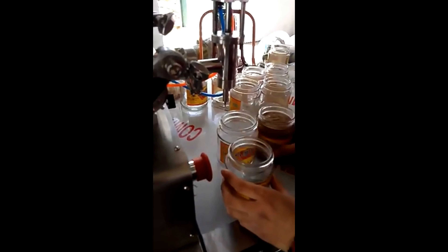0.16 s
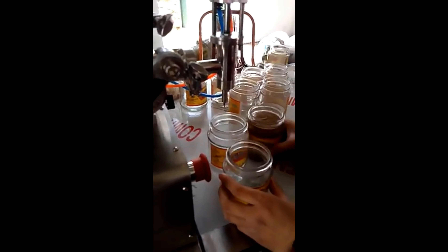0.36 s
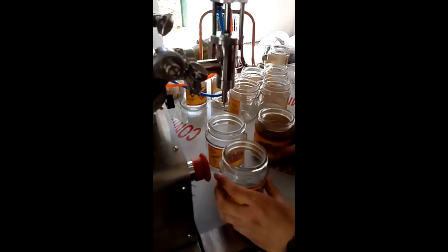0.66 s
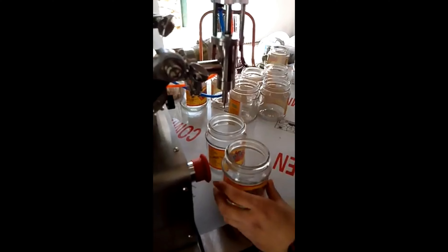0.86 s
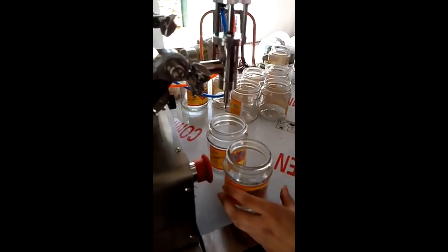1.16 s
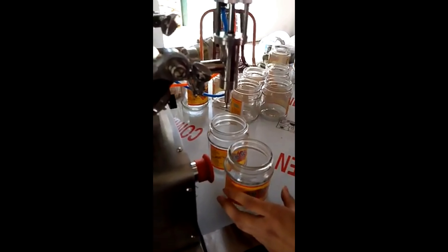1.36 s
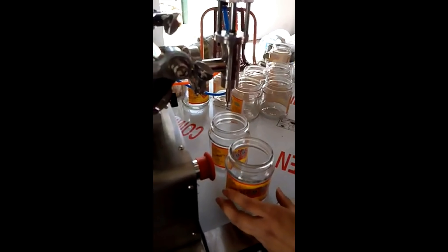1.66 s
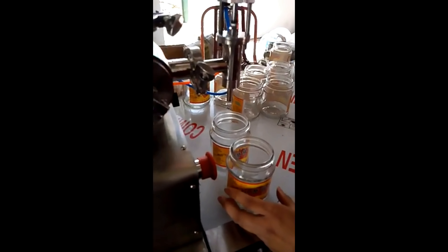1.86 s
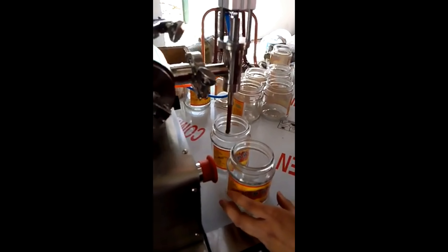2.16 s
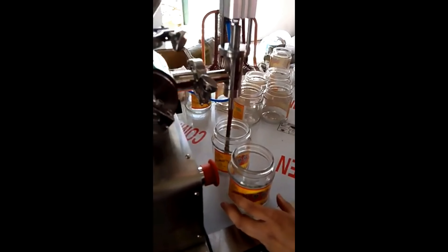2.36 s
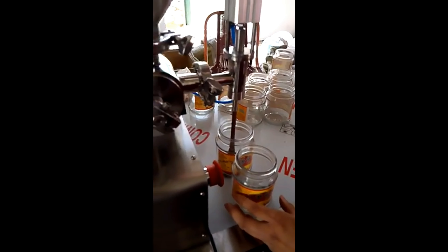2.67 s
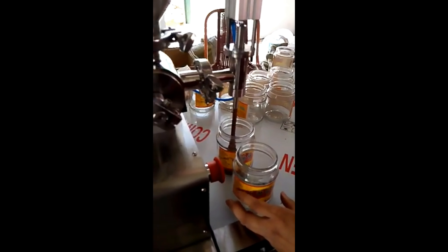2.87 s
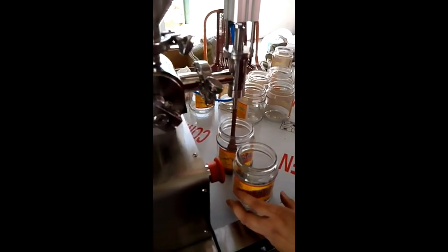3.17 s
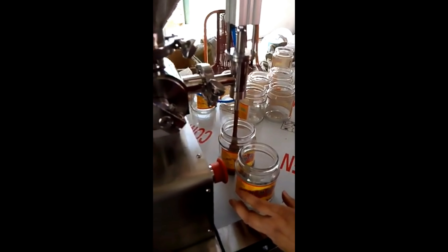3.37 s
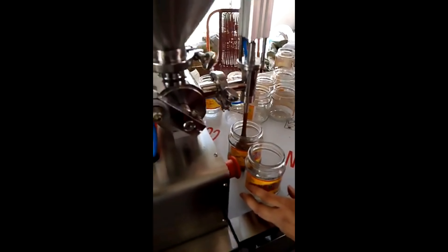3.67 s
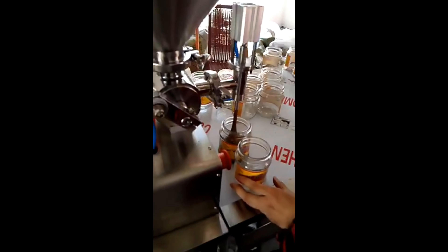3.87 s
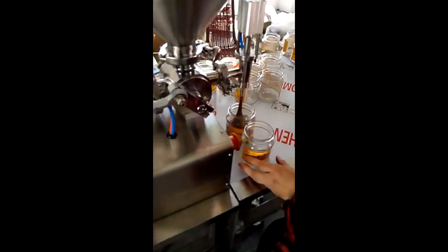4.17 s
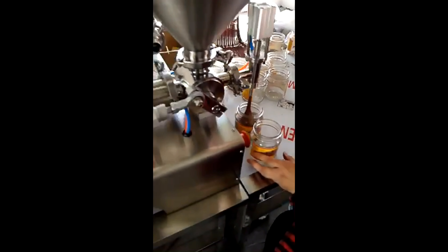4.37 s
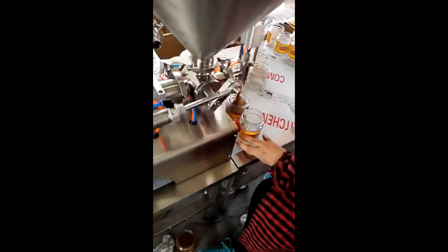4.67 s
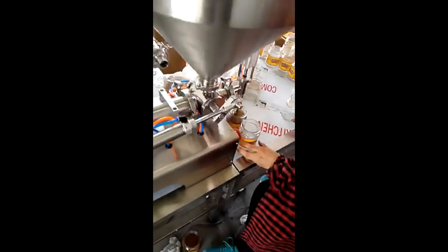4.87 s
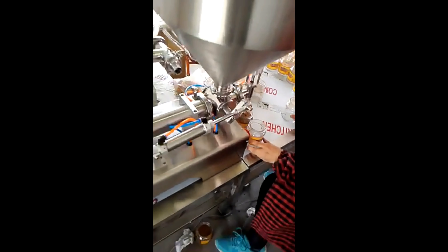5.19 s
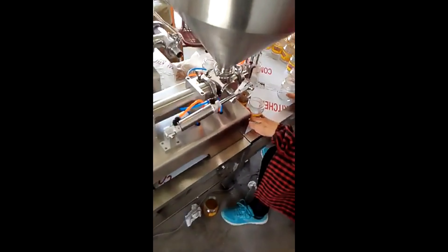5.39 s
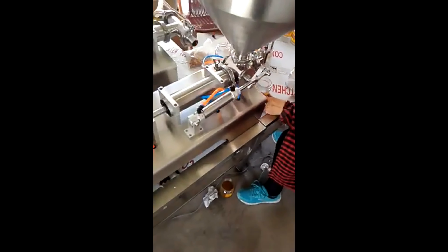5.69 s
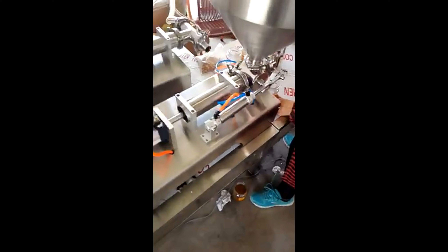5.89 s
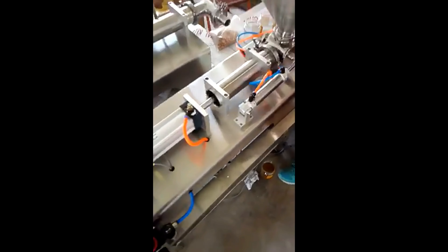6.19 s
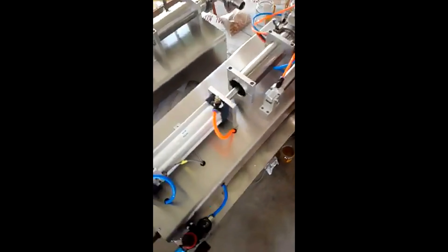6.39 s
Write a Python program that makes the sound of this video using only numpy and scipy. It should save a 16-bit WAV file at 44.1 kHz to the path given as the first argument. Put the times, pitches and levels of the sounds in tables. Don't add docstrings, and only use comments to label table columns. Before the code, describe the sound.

A pneumatic filling machine works close by in a workshop, over the steady, rough drone of a two-cylinder compressor. At 0 s there is a knock and a puff, then a bright, slightly whistling air hiss; glass jars clink and rattle on the tray around 0.2-0.55 s. A light tick comes at 1.1 s. At 1.46 s a thump opens a sharp burst of air, closed by a hard, very bright cluster of steel clacks at 1.6-1.65 s, the loudest moment. A second hiss follows, with jar taps near 1.95 and 2.35 s and a metallic knock at 2.1-2.25 s, thinning through 4 s. At 4.31 s a shriller vent bursts and cuts off at 4.45 s with dull thumps. A softer return hiss shifts in colour, with a small spit at 4.9 s, as the drone changes with the moving microphone. A faint rattle and clink come at 6.4 s. One channel is clear, the other muffled.

```python
import sys
import numpy as np
from scipy import signal
from scipy.fft import rfft, irfft, next_fast_len
from scipy.io import wavfile
from scipy.ndimage import uniform_filter1d, map_coordinates

SR = 44100
rng = np.random.default_rng(int(sys.argv[2]) if len(sys.argv) > 2 else 0)


def dump_mix(stems):
    frames = np.atleast_2d(stems).T
    limited = np.clip(frames, -1, 1)
    pcm = np.round(limited * 32767).astype(np.int16)
    wavfile.write(sys.argv[1], SR, pcm)


def ratio_of_db(decibels):
    return 10 ** (np.asarray(decibels, float) / 20)


N = 288414

# (opens t/s, peak level/dB, sag/dB, sag time/s, shuts t/s)
VENTS = [
    (1.4628, -12.5, 7.5, 0.072, 1.614),
    (4.311, -11.5, 14.5, 0.17, 4.448),
]


def unit(x):
    return x / np.sqrt(np.mean(x ** 2) + 1e-20)


def along(points, hz):
    f, v = np.transpose(points)
    return np.interp(np.log(hz + 1), np.log(f + 1), v)


def curve(rows):
    s, v = np.transpose(rows)
    return np.interp(np.arange(N) / SR, s, v)


def wobble(rate):
    knots = rng.standard_normal(int(N * rate / SR) + 4)
    return map_coordinates(knots, [np.arange(N) * rate / SR], order=2)


def filtered(x, response):
    m = next_fast_len(len(x) + 4096)
    return irfft(rfft(x, m) * response(np.fft.rfftfreq(m, 1 / SR)), m)[:len(x)]


def resonance(f, hz, width):
    return 1j * f * width / (hz * hz - f * f + 1j * f * width)


def add(track, s, sound):
    part = track[round(s * SR):][:len(sound)]
    part += sound[:len(part)]


def jet(colour, pipes, whistle_db, patchy_db, span):
    start, end = span
    count = round((end - start) * SR)
    z = signal.stft(rng.standard_normal(count), nperseg=1024)[2]
    patches = uniform_filter1d(rng.standard_normal(z.shape), size=2, axis=0)
    patches = uniform_filter1d(patches, size=9, axis=1)
    eddies = signal.istft(z * ratio_of_db(patchy_db * unit(patches)), nperseg=1024)[1][:count]

    def response(f):
        power = ratio_of_db(2 * along(colour, f))
        for hz, width, db in pipes:
            power = power + ratio_of_db(2 * (db + whistle_db)) * abs(resonance(f, hz, width + 70)) ** 3
        return np.sqrt(power)

    out = np.zeros(N)
    add(out, start, unit(filtered(eddies, response)))
    return out


def stroke_db(t, k):
    # (start t/s, flow level/dB, first surge/dB, chamber empty after/s)
    strokes = [
        (-.1, -28, 4.5, 33),
        (1.55, -27, 14.5, 2.58),
        (4.4, -31.5, 26.5, 9.0),
    ]
    start, db, surge_db, empty = strokes[k]
    age = np.maximum(t - start, 1e-4)
    building = 1 - np.exp(-(age / 0.14) ** 2)
    left = np.clip(1 - age / empty, 0.02, 1) * building
    surge = surge_db * np.exp(-age / 0.12)
    cut = VENTS[k][0] if k < len(VENTS) else t[-1]
    bleed = 47 * np.maximum(t - cut, 0)
    return db + surge + 20 * np.log10(left) - bleed


def vent_db(t, opens, db, sag_db, sag_s, shuts):
    open_s, swell_s = 0.0012, 0.014
    age = np.maximum(t - opens + open_s, 1e-6)
    after = np.maximum(t - shuts, 0)
    jump = 40 * np.log10(np.minimum(age / open_s, 1))
    swell = -4.5 * np.maximum(1 - age / swell_s, 0)
    sag = sag_db * (1 - np.exp(-np.maximum(age - swell_s, 0) / sag_s))
    shut = 4.5 * np.minimum(after / 0.0087, 1)
    leak = 137 * after
    return db + jump + swell - sag - shut - leak


def shriek(t):
    opens, shuts = VENTS[1][0], VENTS[1][-1]
    mouth = filtered(rng.standard_normal(N), lambda f: resonance(f, 8400, 1300) ** 2)
    return ratio_of_db(vent_db(t, opens, -15, 24, 0.11, shuts)) * unit(mouth)


def air():
    # (f/Hz, level/dB per Hz)
    colours = [
        [(710, -27), (1200, -20), (2190, -11), (3800, -13), (5730, -6), (6940, -5), (7390, -4.5),
         (14100, -23.5), (15000, -51)],
        [(710, -19), (1200, -22), (1400, -8.5), (2780, -9.5), (3600, -0.5), (3990, -5.5), (5290, 0.5),
         (6050, -3), (8780, -8.5), (14300, -25.5)],
        [(710, -45), (1200, -11), (2360, -10), (4270, -4.5), (4790, -7), (7710, -2), (13800, -19.5),
         (14500, -29), (15000, -60)],
        [(240, -24), (400, 0.5), (586, -53), (683, -12), (1660, -7.5), (3560, -2), (4270, -4.5), (6970, 1.5),
         (13900, -12), (15400, -63)],
        [(240, -62), (400, -36), (899, -20), (2390, -9), (2620, -12.5), (3150, -6), (4680, -7), (8900, -1),
         (13900, -16.5), (15400, -78)],
    ]
    # (f/Hz, width/Hz, level/dB)
    hoses = [
        [(3120, 100, -10.5), (3830, 190, -6.5), (4750, 75, -10.5), (5060, 17, -3.5), (6200, 78, -11),
         (6804, 106, 1.5), (7600, 21, -25), (8300, 57, -12)],
        [(3220, 13, -16.5), (3614, 41, -0.5), (4760, 76, 2), (5240, 40, 0.5), (5690, 34, -1.5),
         (6720, 53, -6.5), (7240, 67, -5), (8440, 180, -10)],
        [(3050, 370, -9), (4370, 280, -2), (4950, 70, -4), (5650, 72, 0.5), (6200, 60, -6), (6900, 87, -3),
         (7520, 70, -16), (8300, 300, -7)],
        [(3580, 160, 0), (5000, 680, -1), (6940, 73, 4), (8700, 1500, -3)],
        [(3280, 260, -2), (4340, 100, 3.5), (5330, 130, -1), (7100, 47, -15), (8670, 120, 6.5), (9100, 34, -10),
         (9800, 43, 2)],
    ]
    # (f/Hz, width/Hz, level/dB)
    travel = [
        [(2980, 53, -5), (4300, 170, 2), (5120, 76, -1.5), (6100, 250, -6), (6900, 90, -12), (8200, 400, -9)],
        [(3480, 170, -9), (4140, 230, -5), (5370, 90, -2), (6400, 80, -14), (7000, 80, -11), (7680, 260, -5)],
        [(4300, 330, -8), (5400, 230, -3), (6450, 60, 0), (7040, 110, -6), (7350, 210, -4), (7980, 80, -2)],
    ]
    # (t/s, stage 0-3)
    sweep = [(4.4, 0), (4.9, 0), (5.1, 1), (5.45, 1), (5.65, 2), (5.95, 2), (6.15, 3), (6.54, 3)]
    # (from t/s, to t/s)
    blowing = [
        (0, 2.4),
        (1.45, 5),
        (1.4, 2),
        (4.25, 4.9),
    ]
    # (from t/s, to t/s)
    stages = [
        (4.3, 5.2),
        (4.8, 5.7),
        (5.4, 6.2),
        (5.9, 6.6),
    ]
    # (t/s, extra flow/dB, dies in/s)
    puffs = [
        (.008, 9.5, 0.033),
        (.36, 2.5, 0.047),
        (4.891, 9.5, 0.008),
        (6.41, 2, .03),
    ]
    t = np.arange(N) / SR
    puffs_db = np.zeros(N)
    for s, db, dies in puffs:
        puffs_db += db * np.exp(-np.abs(t - s) / np.where(t > s, dies, dies / 4))

    refill = jet(colours[0], hoses[0], whistle_db=5.5, patchy_db=1.8, span=blowing[0])
    refill *= ratio_of_db(stroke_db(t, 0) + puffs_db)
    dose = jet(colours[1], hoses[1], whistle_db=8, patchy_db=1.2, span=blowing[1])
    dose *= ratio_of_db(stroke_db(t, 1))

    stage, back = curve(sweep), np.zeros(N)
    for k, pipes in enumerate([hoses[2], *travel]):
        share = np.sqrt(np.clip(1 - np.abs(stage - k), 0, 1))
        back += share * jet(colours[2], pipes, whistle_db=2, patchy_db=2, span=stages[k])
    back *= ratio_of_db(stroke_db(t, 2) + puffs_db)

    first = jet(colours[3], hoses[3], whistle_db=6, patchy_db=2.2, span=blowing[2])
    first *= ratio_of_db(vent_db(t, *VENTS[0]))
    second = jet(colours[4], hoses[4], whistle_db=-3, patchy_db=1.5, span=blowing[3])
    second *= ratio_of_db(vent_db(t, *VENTS[1]))
    flutter = ratio_of_db(0.47 * wobble(11) + 0.17 * wobble(55))
    return ratio_of_db(4) * flutter * (refill + dose + back + first + second + shriek(t))


def orders(turns, place):
    # (multiple of shaft, level/dB at rest, leaning in, turned, facing the cylinder)
    shaft_lines = [(2, -50, -50, -51, -50), (4, -64, -64, -63, -60), (6, -61, -61, -63, -65),
                   (7, -65, -66, -73, -71), (8, -60, -57, -62, -63), (9, -75, -65, -65, -61),
                   (10, -49, -49, -61, -57), (11, -52, -55, -49, -51), (12, -51, -55, -58, -57),
                   (13, -59, -58, -49, -56), (14, -48.5, -52, -42, -42), (15, -56, -60, -68, -64),
                   (17, -61, -64, -71, -63), (18, -62, -60, -87, -67), (20, -64, -70, -69, -70),
                   (21, -64, -69, -62, -68), (22, -70, -63, -67, -70), (23, -68, -65, -56, -58),
                   (24, -50, -51, -54, -59), (25, -53, -55, -61, -53), (26, -62, -65, -55, -53),
                   (27, -86, -62, -56, -82), (28, -71, -61, -60, -63), (29, -65, -64, -54, -56),
                   (30, -50.5, -49, -53, -47.5), (31, -57, -49, -55, -50), (32, -54, -48, -54, -63),
                   (33, -67, -60, -62, -64), (34, -63, -62, -63, -61), (35, -61, -63, -64, -65),
                   (36, -66, -56, -69, -52), (37, -67, -82, -63, -73), (38, -60, -63, -78, -79),
                   (39, -63, -87, -70, -60),
                   (40, -63, -55, -60, -68), (41, -67, -50, -54, -48), (42, -64, -55, -57, -58),
                   (43, -52.5, -53, -46, -49), (44, -60, -64, -73, -64), (45, -54, -53, -58, -56),
                   (47, -59, -69, -63, -63), (49, -62, -59, -58, -59), (51, -64, -61, -65, -58),
                   (53, -61, -60, -84, -62), (54, -60, -72, -59, -70), (55, -59, -60, -75, -67),
                   (56, -60, -63, -81, -64), (57, -56, -59, -58, -65), (58, -71, -69, -59, -62),
                   (59, -50, -54, -54, -55), (60, -65, -63, -60, -61), (61, -53, -60, -53, -68),
                   (62, -64, -67, -79, -56), (63, -54, -67, -64, -56), (64, -59, -69, -73, -64),
                   (65, -56, -61, -69, -63), (67, -60, -75, -64, -61), (68, -61, -67, -61, -88),
                   (69, -62, -58, -67, -77), (70, -60, -64, -67, -62), (71, -88, -58, -74, -83),
                   (72, -65, -62, -59, -62), (75, -88, -67, -71, -59), (78, -60, -78, -77, -62),
                   (82, -61, -63, -87, -82)]
    slow, out = np.arange(0, N, 256), np.zeros(N)
    for k, *dbs in shaft_lines:
        knots = rng.standard_normal(15)
        drift_db = 0.57 * (k > 2) * np.interp(slow, np.linspace(0, N, 15), knots)
        gain = ratio_of_db(3 + np.interp(place[slow], range(4), dbs) + drift_db)
        loose = 0.24 if 52 < k < 70 else 0.6 if k > 39 else 1
        phase = rng.random() * loose + (k % 2 == 0) / 4
        out += np.interp(np.arange(N), slow, gain) * np.cos(2 * np.pi * (k * turns + phase))
    return out


def turning(before, after, swing):
    # (f/Hz, level/dB per Hz)
    drone = [
        [(35, -24), (60, -8), (139, -8.5), (241, -7), (471, -7), (717, -2), (865, -3), (965, -0.5), (1130, -5),
         (1360, -9), (2500, -41), (3250, -65), (5500, -120)],
        [(35, -39), (60, -6), (182, -8.5), (324, 1), (449, -7), (695, -0.5), (893, 1), (980, -1), (1080, -9),
         (1400, -35), (2500, -24), (3250, -57), (5500, -120)],
    ]
    first, last = [unit(filtered(x, lambda f: ratio_of_db(along(colour, f)))) for x, colour in zip((before, after), drone)]
    return np.cos(swing * np.pi / 2) * first + ratio_of_db(-1) * np.sin(swing * np.pi / 2) * last


def compressor():
    # (t/s, place 0-3)
    moves = [(0, 0), (3.1, 0), (3.8, 1), (4.3, 1), (4.85, 2), (5.6, 2), (5.9, 3), (6.54, 3)]
    # (f/Hz, level/dB)
    mains = [(100, -59.5)]
    # (f/Hz, level/dB per Hz)
    far_air = [(710, -37), (1200, -5), (1330, -18), (1450, -28), (1710, -6), (1840, -4.5), (3150, -13.5),
               (3350, -3.5), (4040, -1), (5920, -7.5), (8690, 0), (14300, -29)]
    t = np.arange(N) / SR
    turns = 23.3505 * t + 0.425
    place = curve(moves)
    swing = np.clip(place - 1, 0, 1)
    lines = orders(turns, place)
    hum = sum(ratio_of_db(-1 + db) * np.sin(2 * np.pi * hz * t) for hz, db in mains)

    stroke = (2 * turns) % 1
    first_stroke = turns % 1 < 0.5
    ticking = rng.standard_normal(N) * ratio_of_db(-50 * stroke - 2 * first_stroke)
    reeds = unit(filtered(ticking, lambda f: resonance(f, 1450, 700) ** 2))
    puffing = rng.standard_normal((2, N)) * ratio_of_db(-10 * stroke + 1.1 * first_stroke)
    rumble = turning(*puffing, swing)
    breath = rng.standard_normal(N) * ratio_of_db(-5 * stroke + 0.25 * first_stroke)
    hiss = unit(filtered(breath, lambda f: ratio_of_db(along(far_air, f))))
    return lines + hum + ratio_of_db(-45) * rumble + ratio_of_db(-54 - 4.6 * swing) * reeds + ratio_of_db(-35.5) * hiss


def contacts():
    # (t/s, peak level/dB, centre f/Hz, cabinet/dB)
    stops = [(.007, -25.5, 1060, 7.5), (.0075, -24, 1690, -9), (1.124, -29.5, 1470, -9),
             (1.466, -22.5, 2200, 4), (1.48, -18.5, 1970, -6), (1.6, -18.5, 1680, -5),
             (1.629, -18.5, 1580, -0.5), (1.633, -15, 880, -21), (1.636, -23, 1500, -21),
             (1.642, -27, 1590, -23), (1.647, -29, 1300, -9), (1.607, -17, 1330, -12),
             (2.122, -25, 960, -5), (2.124, -15, 875, -17), (2.132, -25, 1900, 2),
             (2.241, -26.5, 975, -0.5), (4.313, -25, 1900, 1.5), (4.343, -27, 1850, -10),
             (4.447, -28.5, 1300, 2.5), (4.453, -31.5, 1100, -2), (4.667, -31.5, 700, -4),
             (6.428, -37.5, 724, 2.5), (6.444, -33, 760, -3)]
    # (t/s, peak level/dB, centre f/Hz)
    nudges = [(0.275, -24.5, 1960), (0.231, -28.5, 2100), (.288, -29.5, 900), (0.358, -31, 1250),
              (0.379, -29, 1150), (0.393, -36, 1200), (.41, -40, 1150), (1.95, -29.5, 1110),
              (2.337, -30, 1720), (2.368, -28, 920), (3.128, -41, 1100), (3.169, -36, 1150)]
    # (t/s, peak level/dB, f/Hz, width/Hz)
    ticks = [(.0075, -30, 2500, 3000), (1.124, -19, 4000, 4000), (1.579, -14, 6030, 4000),
             (1.629, 0.5, 8000, 4500), (2.124, -21, 3400, 900), (1.6286, -13, 4400, 700),
             (2.1217, -18, 2280, 500), (2.2399, -25, 2250, 400), (4.891, -25, 8000, 6000)]
    # (from t/s, to t/s, first level/dB, last level/dB)
    clatter = [
        (0.221, 0.301, -38, -34),
        (0.348, 0.556, -29, -42.5),
        (1.131, 1.181, -32.5, -33.5),
        (1.655, 1.7, -37, -44),
        (6.413, 6.431, -38.5, -34),
    ]
    plate_hz, light_body_db, no_body_db = 286, -4.5, -38
    gap_s = 0.01
    rows = [(s, db, hz, plate_hz, body_db) for s, db, hz, body_db in stops]
    rows += [(s, db, hz, plate_hz, light_body_db) for s, db, hz in nudges]
    rows += [(*tick, no_body_db) for tick in ticks]
    for start, end, first_db, last_db in clatter:
        for s in np.arange(start, end, gap_s):
            late, size, pitch = rng.standard_normal(3)
            db = np.interp(s, [start, end], [first_db, last_db]) + 2 * size
            hz = 1250 * np.exp(0.25 * pitch)
            rows.append((s + late * gap_s / 3, db, hz, plate_hz, light_body_db))
    return rows


def knocks():
    # (f/Hz, width/Hz, level/dB)
    cabinet_modes = [
        (360, 167, -5.5),
        (467, 115, 0),
        (750, 420, -6.5),
    ]
    out, t = np.zeros(N), np.arange(SR // 8) / SR

    def cabinet(f):
        return sum((-1) ** k * ratio_of_db(db) * resonance(f, hz, w) for k, (hz, w, db) in enumerate(cabinet_modes))

    for s, db, hz, width, body_db in contacts():
        shake, spark = rng.standard_normal((2, len(t)))
        rattle = shake * (ratio_of_db(-60 * t / 0.02) + 0.3 * ratio_of_db(-60 * t / 0.08))
        blow = rattle + 9 * (t == 0)
        plates = filtered(blow, lambda f: resonance(f, hz, width))
        body = filtered(blow, cabinet)
        crack = filtered(spark * ratio_of_db(-60 * t / 0.011), lambda f: resonance(f, 3300, 9000))
        add(out, s, ratio_of_db(db + 8.5) * plates / np.abs(plates).max())
        add(out, s, ratio_of_db(db + body_db + 9.5) * body / np.abs(body).max())
        add(out, s, ratio_of_db(db - 34) * crack)
    return out


def ringing():
    # (t/s, peak level/dB, f/Hz, t60/s)
    clear_modes = [(.008, -21, 6500, .03), (.02, -26, 6490, .06), (1.95, -42, 2810, .15),
                   (2.1255, -24, 2300, .025), (2.134, -23, 1030, 0.045), (1.634, -25, 1660, 0.045),
                   (.345, -24, 9600, 0.17), (.345, -31, 7550, .14), (1.601, -21, 1463, 0.054),
                   (2.122, -23, 2260, .04), (2.122, -30, 1723, 0.047), (.358, -29, 823, 0.079),
                   (.378, -28.5, 923, 0.1), (1.467, -23, 984, 0.039), (1.632, -21, 683, 0.076),
                   (1.633, -19, 1490, 0.054), (1.634, -19, 1183, 0.049), (2.123, -26, 905, .07),
                   (3.125, -44, 1120, .2), (3.38, -37, 416, 0.087), (4.314, -26, 910, 0.05),
                   (4.446, -24, 615, 0.06), (4.447, -40, 1540, 0.092), (4.447, -33, 930, 0.074),
                   (4.668, -30.5, 1548, 0.085), (4.669, -31.5, 482, 0.083), (4.889, -40, 505, .09),
                   (4.875, -37, 1790, .06)]
    # (t/s, peak level/dB, f/Hz)
    thumps = [(.007, -24, 251), (1.463, -17.5, 187), (1.5, -24.5, 229), (1.597, -27.5, 304),
              (1.636, -22.5, 233), (1.92, -34, 240), (2.122, -28.5, 270), (4.313, -21, 187),
              (4.346, -26, 196), (4.487, -33, 237), (4.583, -33.5, 187), (4.893, -38.5, 178)]
    out, t = np.zeros(N), np.arange(SR // 8) / SR
    onset = 1 - np.exp(-t / 0.0013)
    for s, db, hz, t60 in clear_modes:
        add(out, s, ratio_of_db(db + 5 - 60 * t / t60) * onset * np.sin(2 * np.pi * hz * t))
    for s, db, hz in thumps:
        pair = np.sin(2 * np.pi * hz * t) + 0.16 * np.sin(2 * np.pi * 1.396 * hz * t)
        add(out, s + 0.00097, ratio_of_db(db + 12 - 60 * t / 0.054) * onset * pair)
    return out


def jars():
    # (t/s, peak level/dB, twin mode/dB, upper modes/dB, t60/s)
    clinks = [(.0075, -41.5, 20, 12, 0.18), (.117, -56, 14, 0, 0.33), (.021, -50, -5, 20, 0.052),
              (0.236, -38.5, -14, 8, 0.11), (0.253, -38, -9, -6, .12), (.277, -41, 7.5, 2, 0.17),
              (0.343, -39, 7, 2, 0.074), (0.356, -27, 5, -3, 0.032), (0.379, -25, -9, -9, 0.063),
              (.385, -19, -10, -11.5, 0.058), (.396, -34, -10, -7, 0.044), (0.43, -43, -2, 0, .08),
              (1.124, -29.5, -1.5, -18, 0.18), (1.948, -32.5, -4, -3, 0.14), (1.966, -41, -10, -6, 0.1),
              (1.987, -40, -5, -8, 0.13), (2.337, -35.5, -9, -8, 0.1), (6.411, -33, -10, -2.5, 0.09),
              (6.419, -40, -10, 5, 0.061), (6.428, -46, -8, 4, 0.11), (6.449, -43, -5, -6, .15)]
    # (ratio to lowest, level/dB)
    glass_modes = [(2.116, 1.5), (2.396, -8), (2.426, 1), (3.143, -3)]
    jar_hz, twin_hz = 3077, 3150
    out, t = np.zeros(N), np.arange(SR // 3) / SR
    onset = 1 - np.exp(-(t / 0.0013) ** 2)
    linger = ratio_of_db(-28.5 - 60 * t / 0.57)
    for s, db, twin_db, upper_db, t60 in clinks:
        upper = np.zeros(len(t))
        for ratio, level in glass_modes:
            luck_db = rng.normal(0, 2.5)
            fade = ratio_of_db(level + luck_db + upper_db - 60 * t / t60 * ratio ** 0.14)
            upper += fade * np.sin(2 * np.pi * ratio * jar_hz * t)
        pair = np.sin(2 * np.pi * jar_hz * (s + t)) + ratio_of_db(twin_db) * np.sin(2 * np.pi * twin_hz * t)
        low = (ratio_of_db(-60 * t / t60) + linger) * pair
        add(out, s, ratio_of_db(db + 9.5) * (low + upper) * onset)
    return out * ratio_of_db(0.88 * wobble(90))


def workshop(x):
    hz, t, z = signal.stft(rng.standard_normal(SR // 2), SR, nperseg=256)
    t60 = along([(200, 1.0), (2000, 0.34), (10000, 0.058)], hz)
    tail = signal.istft(z * ratio_of_db(-60 * t / t60[:, None]), SR, nperseg=256)[1]
    return signal.fftconvolve(np.pad(x, (500, 0)), tail / np.linalg.norm(tail))[:N]


def scene():
    hits = filtered(knocks() + ringing(), lambda f: resonance(f, 1560, 13800) ** 2)
    glass = jars()
    to_room = ratio_of_db(-9) * filtered(hits, lambda f: 1 - 0.44 / (1 + (f / 330) ** 4)) + 0.14 * glass
    near = air() + compressor() + hits + glass + workshop(to_room)
    return np.array([near, near])


def covered(f, cavity_hz=230, lift_hz=180, q=0.53):
    late = np.exp(-2j * np.pi * f * 23 / SR)
    dull = 1 / (1 + (f / 8000) ** 2)
    cavity = (1 + 1j * f / lift_hz) / (1 - (f / cavity_hz) ** 2 + 1j * f / (cavity_hz * q))
    return late * dull * cavity


def low_pass(x):
    return signal.sosfilt(signal.butter(12, 15580, fs=SR, output="sos"), x)


def record(dry):
    clipped = dry[0] / (1 + np.abs(dry[0]) ** 10) ** (1 / 10)
    open_port = filtered(clipped, lambda f: ratio_of_db(-43) + 1 / (1 + (f / 14270) ** 300))
    mix = np.array([open_port, filtered(open_port, covered)])
    return low_pass(mix)


dry = scene()
out = record(dry)
dump_mix(out)
```